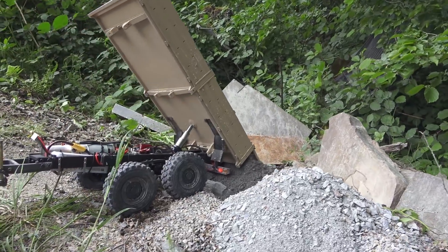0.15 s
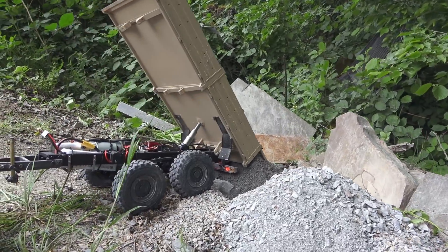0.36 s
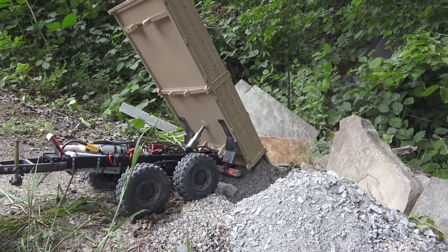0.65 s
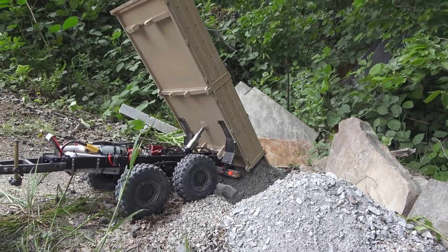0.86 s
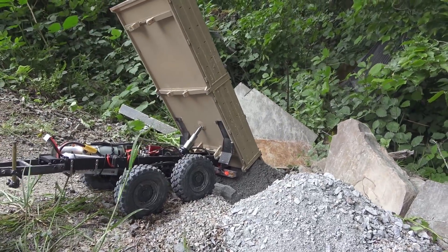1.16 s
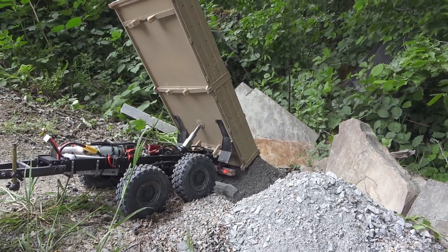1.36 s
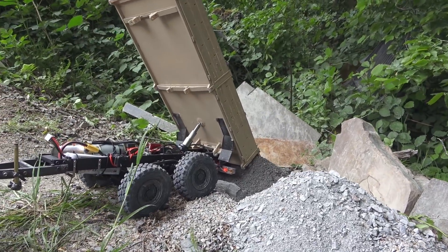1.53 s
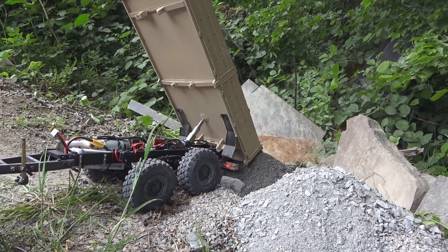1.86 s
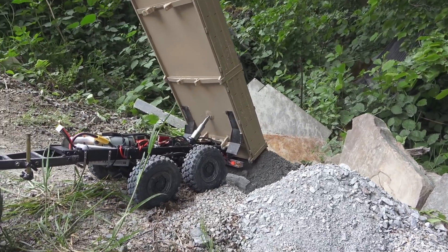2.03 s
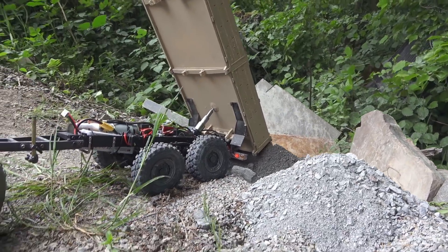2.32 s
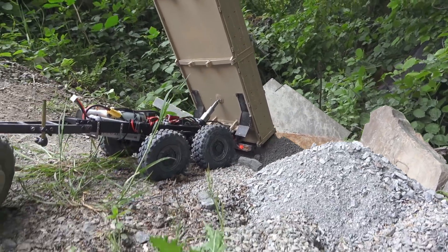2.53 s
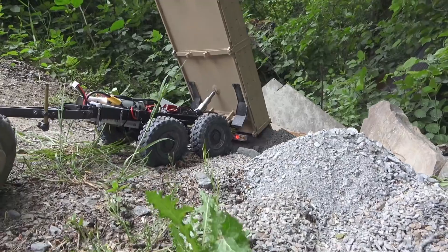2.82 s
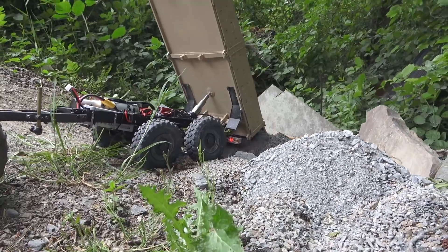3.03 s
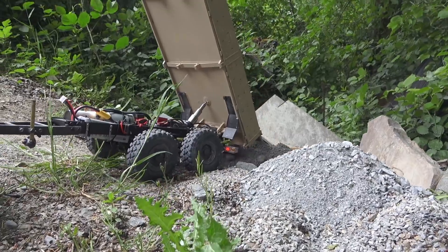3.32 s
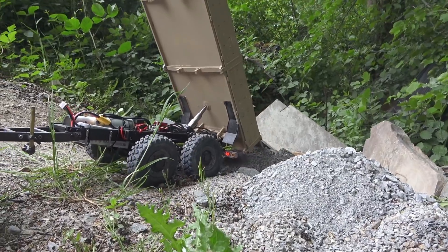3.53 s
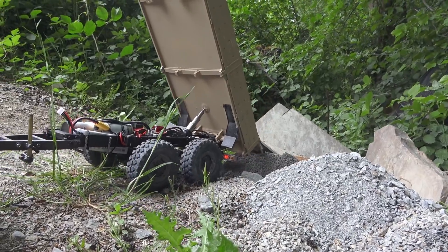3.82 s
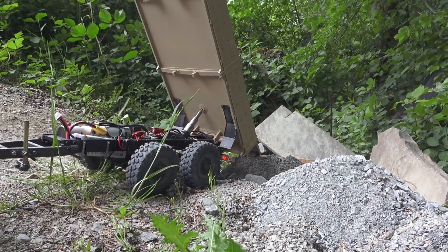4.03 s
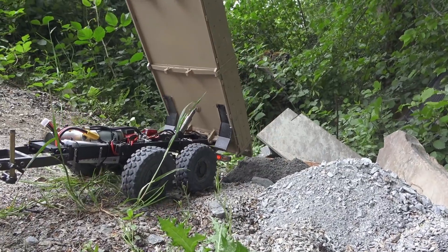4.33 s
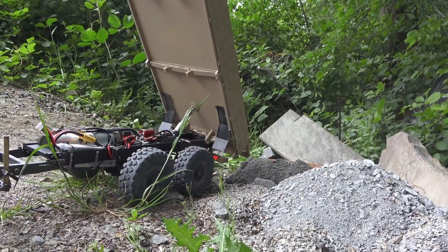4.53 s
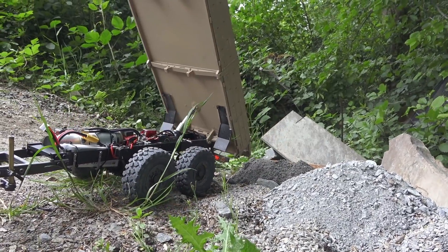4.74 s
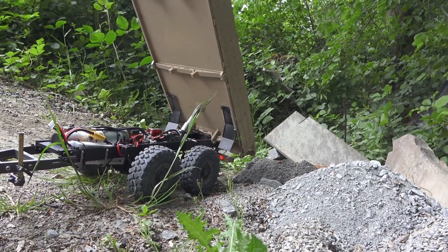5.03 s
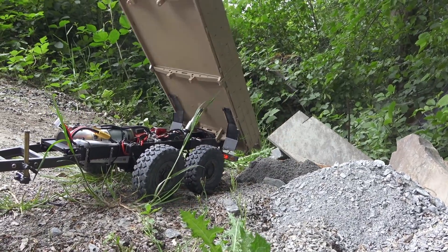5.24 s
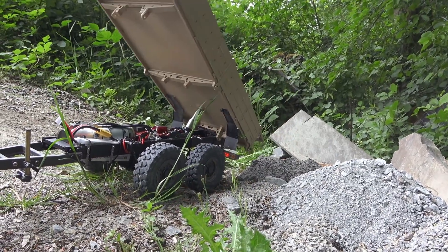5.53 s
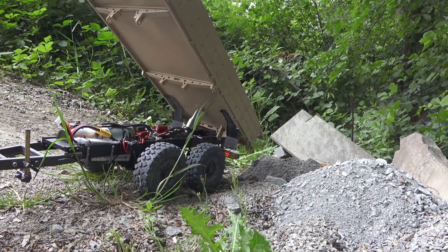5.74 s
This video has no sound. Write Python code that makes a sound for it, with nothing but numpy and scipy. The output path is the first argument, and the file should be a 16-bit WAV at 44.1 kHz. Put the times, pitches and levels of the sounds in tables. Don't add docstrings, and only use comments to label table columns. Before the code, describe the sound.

Close, dry outdoor sound, strongest on the left: buzzing, chopped engine growl with irregular knocks and metallic gear clatter, swelling three times as the truck pulls its tipped trailer. A high rough electric pump whine runs steadily underneath with airy hiss. Late on, the growl drops, the whine lifts slightly, and a long then a short servo whir surround a bright tick.

```python
import sys
import numpy as np
from scipy import signal
from scipy.fft import rfft, irfft, next_fast_len
from scipy.io import wavfile
from scipy.ndimage import uniform_filter1d

SR = 44100
rng = np.random.default_rng(int(sys.argv[2]) if len(sys.argv) > 2 else 0)


def digitize_waveform(pressure):
    field = np.atleast_2d(pressure).T
    bounded = np.clip(field, -1, 1)
    quanta = np.round(bounded * 32767).astype(np.int16)
    wavfile.write(sys.argv[1], SR, quanta)


def amplitude_ratio(level_db):
    exponent = np.asarray(level_db, float) / 20
    return 10 ** exponent


N = 259300


def unit(x):
    return x / np.sqrt(np.mean(x ** 2, -1, keepdims=True) + 1e-20)


def along(points, hz):
    f, v = np.transpose(points)
    return np.interp(np.log(hz + 1), np.log(f + 1), v)


def curves(rows):
    s, *columns = np.transpose(rows)
    return [np.interp(np.arange(N) / SR, s, column) for column in columns]


def wobble(rate):
    knots = int(N * rate / SR) + 2
    return np.interp(np.arange(N) * rate / SR, np.arange(knots), rng.standard_normal(4000)[:knots])


def spell(start, end, t):
    return np.clip(np.minimum(t - start, end - t) / 0.08 + .5, 0, 1)


def filtered(x, response):
    m = next_fast_len(N + 8192)
    return irfft(rfft(x, m) * response(np.fft.rfftfreq(m, 1 / SR)), m)[..., :N]


def pair(alike):
    a, b = rng.standard_normal((2, N))
    alike = np.clip(alike, 0, 1)
    return np.array([a, alike * a + np.sqrt(1 - alike ** 2) * b])


def coloured(spectrum, alike):
    points = [(1, -120), *spectrum, (SR, -120)]
    return unit(filtered(pair(alike), lambda hz: amplitude_ratio(along(points, hz))))


def chugs(fade, scatter_db, odd_db, usual_db):
    # start_s, firings_per_s
    firing = [(0, 36), (.5, 38.4), (.9, 39.2), (1.3, 43), (2, 41.8), (2.4, 43.2), (4.35, 43.8), (4.9, 40),
              (5.88, 41)]
    # onset_s, peak_db
    knocks = [(0.0797, -30.5), (0.139, -32.5), (0.2359, -28.5), (0.2987, -32), (0.3536, -30.5),
              (0.455, -29), (0.5533, -35), (0.613, -30.5), (0.663, -27), (0.7098, -31), (0.7722, -31),
              (0.8215, -31.5), (0.8664, -34), (1.03, -28), (1.0819, -27), (1.1186, -28.5), (1.167, -26.5),
              (1.214, -27), (1.278, -28.5), (1.3583, -26), (1.402, -25.5), (1.441, -25.5), (1.491, -29),
              (1.5405, -24.5), (1.667, -32.5), (2.0086, -31), (2.1041, -28), (2.2009, -25.5),
              (2.251, -24.5), (2.303, -27.5), (2.362, -32), (2.5695, -29.5), (2.6145, -27), (2.653, -26.5),
              (2.7516, -25), (2.7916, -27.5), (2.8394, -28), (2.8888, -25), (2.954, -27), (3.038, -27.5),
              (3.078, -26.5), (3.167, -28), (3.2196, -25.5), (3.26, -26), (3.443, -30.5), (3.484, -30),
              (3.586, -33.5), (3.721, -27), (3.767, -29), (3.9035, -24.5), (3.9494, -27.5), (3.9983, -30),
              (4.084, -28.5), (4.174, -32.5), (4.2198, -29), (4.263, -27), (4.4406, -30), (5.3405, -35),
              (5.539, -35.5), (5.7143, -32)]
    s, knock_db = np.transpose(knocks)
    s = np.r_[0, s - 0.0049, N / SR]
    steps = 2 * np.maximum(np.round(np.diff(s) * np.interp(s[1:], *np.transpose(firing)) / 2), 1)
    marks = np.r_[0, np.cumsum(steps)].astype(int) + 2
    turn = np.interp(np.arange(N) / SR, s, marks) + 0.039 * wobble(25)
    turn = turn + np.array([[.06], [.06], [.02]]) * np.array([wobble(30) for band in range(3)])
    count = turn.astype(int)
    phase = turn % 1

    shared, own = rng.standard_normal(400), rng.standard_normal((3, 400))
    shared_db = 1.05 * scatter_db * shared - 0.5
    shared_db[marks[1:-1]] = knock_db - usual_db[(s[1:-1] * SR).astype(int)]
    size_db = np.array([[.6], [.8], [1]]) * shared_db[count]
    size_db = size_db + scatter_db * 1.03 * np.take_along_axis(own, count, axis=1)
    size_db = size_db + odd_db * (count % 2)
    pulse = np.exp(-phase / fade) * (1 - np.exp(-phase / 0.2)) * (1 - phase)
    return unit(uniform_filter1d(amplitude_ratio(size_db) * (0.37 + pulse), size=SR // 150))


def body_drive(growl_db, clatter_db):
    # onset_s, peak_db
    thumps = [(0.198, -13), (0.42, -15), (0.66, -12.5), (0.895, -8), (0.936, -10.5), (1.083, -7.5),
              (1.127, -2), (1.261, -20), (1.301, -12), (1.334, -22), (1.507, -7), (1.538, -14),
              (1.718, -17), (1.802, -12), (1.926, -15.5), (2.002, -9), (2.093, -12), (2.127, -14),
              (2.171, -15), (2.211, -12), (2.26, -9), (2.617, -17), (2.678, -7.5), (2.757, -20),
              (3.168, -11.5), (3.22, -18), (3.803, -20), (3.856, -7), (3.906, -11.5), (4.01, -9.5),
              (4.063, -11), (4.112, -8.5), (4.22, -18), (4.251, -12.5), (4.3, -9.5), (4.35, -6.5),
              (4.483, -12.5), (4.532, -8.5), (5.218, -18), (5.288, -13), (5.819, -19)]
    depth = np.array([[.5], [.65], [.78]])
    usual_db = growl_db + clatter_db + 12
    odd_db = np.array([[-4], [-4.5], [-6.5]])
    beat = 1 - depth + depth * chugs(fade=0.17, scatter_db=1.5, odd_db=odd_db, usual_db=usual_db)
    blows = np.zeros((3, N))
    for s, db in thumps:
        i = round(s * SR)
        blows[:2, i] = amplitude_ratio(db - growl_db[i] + np.array([17, 9]))
    m = next_fast_len(N + 8192)
    f = np.fft.rfftfreq(m, 1 / SR)
    force = pair(0)[:, None] * [beat, np.roll(beat, SR // 200, axis=1)] + blows
    return rfft(force, m) * (1j * f / (70 + 1j * f)) ** 3


def echoed(x):
    # start_s, end_s, first_hz, last_hz, width_hz, depth_db
    dips = [(0, 1.1, 2650, 2620, 60, -6), (1.4, 2.3, 1150, 1160, 25, -6), (2.8, 3.85, 1120, 1170, 32, -10),
            (3.8, 4.2, 1170, 1270, 32, -9), (4.15, 4.55, 1270, 1450, 40, -8), (4.5, 6, 1460, 1490, 45, -7),
            (0, .7, 1760, 1780, 45, -6), (0, .5, 2170, 2170, 40, -6), (3.4, 6, 2170, 2170, 35, -7),
            (4.6, 6, 1990, 2000, 35, -6), (3.5, 4.8, 3120, 2750, 36, -10), (1, 2, 3400, 3200, 80, -5),
            (0, 2.65, 3540, 3520, 55, -6), (2.6, 5.7, 3480, 3520, 80, -8), (0, 1.2, 4200, 4300, 110, -4),
            (1.6, 2.5, 4600, 4450, 70, -6), (2.5, 3.75, 4300, 4700, 150, -5), (2.5, 6, 536, 543, 17, -9),
            (1, 5.2, 110, 99, 10, -9)]
    hz, t, z = signal.stft(x, SR, nperseg=2048, noverlap=1536)
    cut_db = np.zeros(z.shape)
    for start, end, first_hz, last_hz, width, depth_db in dips:
        centre = np.interp(t, (start, end), (first_hz, last_hz))
        shape = np.exp(-((hz[:, None] - centre) / width) ** 2)
        cut_db += depth_db * shape * spell(start, end, t)
    return signal.istft(z * amplitude_ratio(cut_db), SR, nperseg=2048, noverlap=1536)[1][:N]


def engine():
    # start_s, growl_db
    effort = [(0, -25), (.44, -23.5), (.75, -24.5), (1.15, -17), (1.46, -16), (1.62, -23.5), (1.76, -22.5),
              (1.9, -27), (2.05, -18.5), (2.42, -17.5), (2.56, -23), (2.85, -18.5), (3.25, -21.5),
              (3.57, -24.5), (3.9, -19), (4.32, -21.5), (4.45, -23.5), (4.96, -26), (5.88, -24)]
    # start_s, place (0-4)
    places = [(0, 0), (.95, 0), (1.15, 1), (2.45, 1), (2.75, 2), (3.4, 2), (3.8, 3), (4.3, 3), (4.5, 4),
              (5.88, 4)]
    bark_levels = [-7, -8, -3.5, -6.5, -8]
    clatter_levels = [-18.5, -21, -19, -20, -22]
    body = list([(144, 56, -18.5, -13, -16.5, -14, -18.5), (184.0, 67.0, -13.0, -6.5, -6.5, -5.0, -13.0),
            (282.5, 70, -12.5, -6.0, -6.5, -4.0, -11.5), (367.5, 38.2, -4.5, -4.5, 1.0, 4.0, 1.0),
            (549.0, 49.0, -1.5, 4.5, -24, -51, -23), (601, 35.5, -7.5, 2, -13, -12.5, -12.5),
            (674, 69, -2.5, 4.5, -2.0, 0.5, -6.5), (752.3, 18.4, -9.5, -0.5, -34, -33, -16.0),
            (1060, 110, -11.5, -4.0, -10.5, -7.5, -3), (1253, 32, -19, -7, -2, -11, -12),
            (1333, 53, -5, -0.5, -1, -6.0, -5.5), (1489, 167, -14.0, -4.5, -5.5, -6.5, -9.5),
            (1791, 80, -31, -24, -6.5, -4.0, -3.5), (1934, 148, -17.5, -8.0, -19.5, -20.0, -26)])
    casing = list([(2383, 157, -27.5, -19.0, -31.0, -25.0, -26.5), (2580, 200, -53, -30, -15.5, -25, -33.0),
              (2896, 64, -21, -18.5, -19, -38, -30), (3090, 127, -18.5, -18, -12.0, -16.0, -27.0),
              (3318, 176, -28, -25.5, -19.0, -27, -27.0), (3784, 250, -28.5, -21.5, -14.5, -23.5, -31.5),
              (4230, 260, -38, -32.0, -32, -27.5, -34.5), (4810, 260, -35.5, -29.0, -24.0, -24.5, -36.0),
              (5330, 860, -45, -36.0, -33.0, -32, -41)])
    # pitch_hz, width_hz, level_db at each of the five places
    hollow = [(411, 21, -41, -19, -0.3, 2.5, -19), (877, 23, -25, -14, -13.5, -11.5, -18),
              (2050, 39, -30, -16, -18.5, -18, -22), (493, 19.4, -20, -3.5, -17, -25, -16)]
    right_body = list([(139.0, 59, -25.0, -18.5, -24.5, -23, -29.5),
                  (179, 62, -30, -24.0, -24.0, -24.0, -40), (268.0, 43, -24.5, -20.0, -20.0, -22.0, -32.0),
                  (397, 22, -50, -25, -21, -16, -21.5), (530, 20, -24.0, -17.5, -22, -41, -22),
                  (570, 18.0, -23, -13.0, -37, -45, -32), (680, 69, -18.0, -11.0, -21.0, -22.5, -59),
                  (1115, 120, -28, -23.5, -21.0, -19.5, -32), (1266, 150, -29.0, -19.5, -39, -22, -29),
                  (1600, 140, -55, -36, -54.0, -33, -51), (1890, 46, -53, -40, -29, -50, -50),
                  (2107, 41, -57.5, -41, -27.5, -29.0, -25)])
    right_casing = list([(2380, 94, -39, -41, -43, -49, -36), (2466, 140, -60, -33, -36, -69, -70),
                    (2900, 130, -61, -53, -45, -68, -70), (3500, 120, -47, -49, -33, -46, -41.0),
                    (4060, 190, -68, -60, -51, -66, -54), (4800, 410, -54, -65, -51, -66, -68)])
    notches = [450, 1180, 1650, 2200, 2750, 3600, 4400]

    growl_db, = curves(effort)
    place, = curves(places)
    bark_db = np.interp(place, range(5), bark_levels)
    clatter_db = np.interp(place, range(5), clatter_levels)
    drive = body_drive(growl_db, clatter_db)
    m = next_fast_len(N + 8192)
    f = np.fft.rfftfreq(m, 1 / SR)
    groups = np.zeros((3, 2, N))
    left_modes = [*body, *casing, *hollow]
    left_hz = np.array(left_modes)[:, 0]
    for side, modes in enumerate((left_modes, [*right_body, *right_casing])):
        for hz, width, *levels in modes:
            band = int(hz > 900) + int(hz > 2200)
            ring = (1j * f * 1.4 * width / (hz * hz - f * f + 1j * f * 1.783 * width)) ** 2
            level_db = np.interp(place, range(5), levels) + 2.0 * wobble(7)
            notch = np.searchsorted(notches, hz)
            panel = (np.abs(left_hz - hz).argmin() - notch) % 2
            sound = irfft(drive[panel, band] * ring, m)[:N]
            groups[band, side] += (-1) ** notch * amplitude_ratio(level_db) * sound
    power = np.abs(uniform_filter1d(groups[:, :1] ** 2, size=SR // 3))
    steady = groups / np.sqrt(power + 1e-12)
    over_growl = (0, bark_db, clatter_db)
    left, right = amplitude_ratio(5) * sum(amplitude_ratio(growl_db + db) * part for db, part in zip(over_growl, steady))
    return np.array([echoed(left), right])


def engine_note():
    # start_s, pitch_hz, level_db
    hum = [(0, 499.8, -34), (.4, 503, -29.5), (.6, 498.6, -32), (.85, 510, -28), (.95, 531, -29),
           (1.1, 558, -22), (1.22, 592, -42), (1.32, 570, -47), (1.4, 570, -72)]
    hz, db = curves(hum)
    note = np.sin(2 * np.pi * np.cumsum(hz * (1 + 0.024 * wobble(41))) / SR)
    return amplitude_ratio(db + 3.5 * wobble(31.0)) * note * amplitude_ratio([[8], [-12]])


def tyres():
    # start_s, level_db
    rolling = [(0, -81), (1.95, -57), (2.07, -52), (2.11, -39.5), (2.16, -47.5), (2.46, -45.5), (2.55, -74),
               (6, -59)]
    # pitch_hz, level_db per Hz
    grit = [(3400, -30), (3850, -4), (4050, -5), (4220, -25), (4600, -16)]
    db, = curves(rolling)
    turn = np.clip((np.arange(N) / SR - 2.1) / .35, 0, 1) * np.pi / 2
    faster = [(hz * 1.07, level) for hz, level in grit]
    crunch = np.cos(turn) * coloured(grit, alike=.7) + np.sin(turn) * coloured(faster, alike=.7)
    return amplitude_ratio(db + 1.5 * wobble(41) + 4.2 * wobble(240)) * crunch * amplitude_ratio([[5], [-16]])


def pump():
    # start_s, tooth_rate_hz
    speed = [(0, 1252), (.1, 1250.4), (.22, 1235.5), (.36, 1233.5), (.44, 1205.5), (1.08, 1209),
             (1.25, 1203.8), (1.7, 1204.2), (1.97, 1210), (2.2, 1207), (2.29, 1200), (2.75, 1203.2),
             (4.1, 1203.8), (5.05, 1206.5), (5.15, 1230), (5.43, 1235.5), (5.62, 1218), (5.88, 1216.8)]
    # start_s, level_db
    shade = [(0, 0), (4.3, 0), (4.4, -6), (5.1, -6), (5.15, -9), (6, -9)]
    # tooth_multiple, level_db of orders -3..+3
    teeth = [(4, -11, -22, -30, 2, -20, -15, -20), (5, -38, -25, -14, -18, -25, -22, -28),
             (6, -21, -26, -11, -1, -15, -28, -38), (7, -20, -20, 1.5, -1, -20, -3, -18),
             (8, -18, -27, -10, -0.5, -11, -23, -11), (9, -14, -15, -8, -6, -27, -8.5, -23),
             (10, -31, -24, -2, 1, -12, -16, -7), (11, -20, -16, 0, -12, -16, -16, -18),
             (12, -19, -21, -10, -13, -13, -13, -16), (13, -17, -13, -10, -14, -22, -40, -35)]
    # tooth_multiple, start_s, end_s, level_db
    lobes = [(4, 0, .4, -4), (4, 1.15, 6, -6), (4, 3.3, 5.1, -5), (5, 0, 1, -3), (4, 5.1, 5.6, -4),
             (4, 5.6, 6, 2), (5, 5.1, 6, 7), (6, 1.45, 2.1, 5), (6, 2.6, 4.4, 2), (6, 5.15, 6, 8),
             (7, 2.45, 4.2, -4), (7, 4.25, 5.1, 4), (8, 0, .12, 4), (8, 0, .42, 3), (8, 1.35, 2.22, -5),
             (8, 2.25, 2.7, 2), (8, 3.95, 4.55, 5), (8, 4.15, 4.35, 4), (8, 4.6, 6, -5), (9, 0, 1, 2),
             (9, 1.1, 2.9, -3), (9, 4.3, 4.5, 6), (9, 5.1, 6, 3), (10, 1.05, 1.35, -6), (10, 2.8, 3.4, -3),
             (11, 1, 1.3, -4), (11, 1.5, 2.3, 3), (11, 2.35, 3, -5), (11, 4.3, 6, 4), (12, 1.3, 2.4, 2),
             (12, 2.4, 4, -3), (13, 0, 1, -4), (13, 4.3, 6, -5)]
    loudness = [-57, -65, -66, -61.5, -59.5, -59.5, -60, -63, -62.5, -63]
    # pitch_hz, level_db per Hz
    hiss = [(2650, -27), (4500, -3), (7770, -3), (8440, -7), (10200, -8), (12700, -13), (15100, -9),
            (15600, -19)]

    tooth_hz, = curves(speed)
    shade_db, = curves(shade)
    t = np.arange(N) / SR
    turn = 2 * np.pi * np.cumsum(tooth_hz / 12 * (1 + .0005 * wobble(40) + .0006 * wobble(7))) / SR
    orders = np.exp(1j * np.arange(-5, 7)[:, None] * turn)
    flicker = amplitude_ratio(3.5 * np.array([wobble(8) for order in orders]))
    far_db = -23
    out = np.zeros((2, N))
    for multiple, *sides in teeth:
        k = round(multiple)
        sizes = amplitude_ratio(np.r_[[far_db] * 2, sides, [far_db] * 3])
        sizes = 1.425 * sizes / np.linalg.norm(sizes) * np.exp(2j * np.pi * rng.random(len(sizes)))
        uneven = sizes @ (np.roll(flicker, k * SR // 2, axis=1) * orders if k > 6 else orders)
        fuzz = amplitude_ratio(-20) * (wobble(400) + 1j * wobble(400))
        lobes_db = sum(db * spell(start, end, t) for which, start, end, db in lobes if round(which) == k)
        level_db = loudness[k - 4] + .9 * wobble(5) + lobes_db + shade_db * (k > 8)
        lead = np.exp(1j * 0.34 * np.array([[1], [-1]]) * np.cos(2 * k))
        line = (lead * (amplitude_ratio(level_db) * (uneven + fuzz) * np.exp(12j * k * turn))).real
        left_over_right_db = along([(4800, 14.5), (8000, 3.6), (15000, 4.3)], k * 1205)
        out += line * amplitude_ratio(np.array([[.5], [-.5]]) * left_over_right_db)
    return out + amplitude_ratio(shade_db / 6 - 57.0 + wobble(4.25)) * coloured(hiss, alike=0.12)


def servo():
    # top_speed_s, spin_up_s, run_down_s, top_gear_rate_hz, tone_db, rasp_db, share of the spin
    # it sings, level_db of the tone at twice the gear rate
    strokes = [
        (5.058, .097, .139, 1720, -44.5, -43, .74, -4),
        (5.55, .055, .065, 1625, -49, -48, .38, 7),
    ]
    # multiple of the gear rate, level_db
    gears = [(3, 1), (3.75, -6), (4.7, -2), (1.55, 8), (5.5, -12), (6.25, -6)]
    # pitch_hz, level_db
    case = [(2000, -26), (2950, -14), (3290, 5), (3500, -6), (3750, -15), (4200, -6), (4800, 5), (5150, -8),
            (6000, -10), (7600, -1), (11000, -8)]
    # pitch_hz, level_db per Hz
    whir = [(1470, -35), (2500, -5), (3050, -10), (3370, 0), (3900, -8), (4940, 2), (10000, -4),
            (15600, -15)]
    out = np.zeros((2, N))
    for s, up_s, down_s, top_hz, tone_db, rasp_db, hold, low_db in strokes:
        late = np.arange(N) / SR - s
        away = late / np.where(late < 0, up_s, down_s)
        gear_hz = np.maximum(top_hz * (1 - away ** 2), 400)
        db = np.maximum(-6 * (away / hold) ** 6, -120)
        turn = 2 * np.pi * np.cumsum(gear_hz * (1 + 0.0153 * wobble(300))) / SR
        tones = np.zeros(N)
        for k, level in [(2, low_db), *gears]:
            tones += amplitude_ratio(level + along(case, k * gear_hz) + 3.5 * wobble(140)) * np.sin(k * turn)
        rasp = coloured(whir, alike=0.42) * amplitude_ratio(2 * wobble(220))
        out += amplitude_ratio(db) * (amplitude_ratio(tone_db) * tones * amplitude_ratio([[8], [-12]]))
        dull = filtered(rasp, lambda hz: 1 / (1 + (hz / 7000) ** 4))
        rasp = dull + (rasp - dull) * amplitude_ratio(-6 * np.minimum(np.abs(away) / .5, 4) ** 2)
        rasp_level_db = rasp_db - 6 * np.minimum(np.abs(away) / .7, 4) ** 3
        out += amplitude_ratio(rasp_level_db) * rasp * amplitude_ratio([[3], [-5]])
    return out


def ticks():
    # onset_s, peak_db
    clicks = [(2.3739, -29), (3.9994, -27), (4.2305, -27), (4.6164, -33), (5.4233, -22)]
    out, t = np.zeros(N + SR), np.arange(600) / SR
    for s, db in clicks:
        out[round(s * SR):][:len(t)] += amplitude_ratio(db - 60 * t / 0.0095) * rng.standard_normal(len(t))
    bright = filtered(out[:N], lambda f: (1j * f / (2500 + 1j * f)) ** 2 / (1 + (f / 9000) ** 6))
    return bright * amplitude_ratio([[0], [-9]])


def far_rumble():
    # pitch_hz, level_db per Hz
    rumble = [(20, 1), (45, 11), (80, 3), (120, 21), (200, -26)]
    return amplitude_ratio(-58.5) * coloured(rumble, alike=1.0)


def scene():
    truck = engine() + engine_note() + tyres()
    trailer = pump() + servo() + ticks()
    return truck + trailer + far_rumble()


def top_cut(x):
    return signal.sosfilt(signal.butter(12, 15830, fs=SR, output="sos"), x)


def record(dry):
    rounded = dry / (1 + np.abs(dry / .97) ** 12) ** (1 / 12)
    return top_cut(rounded)


dry = scene()
out = record(dry)
digitize_waveform(out)
```